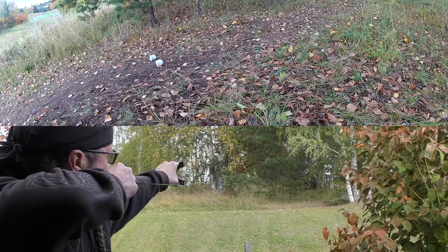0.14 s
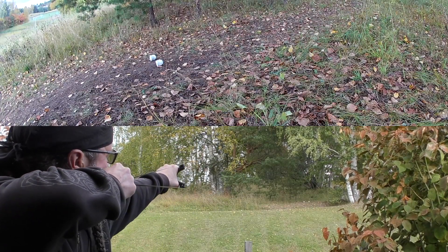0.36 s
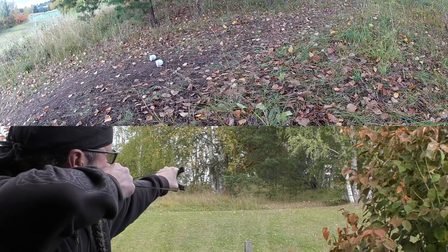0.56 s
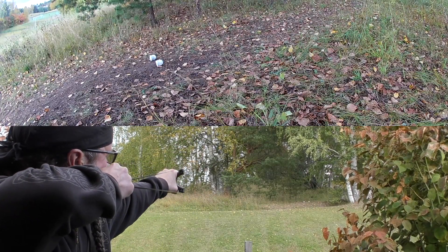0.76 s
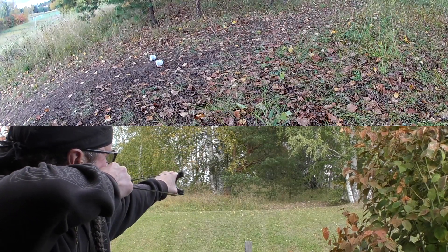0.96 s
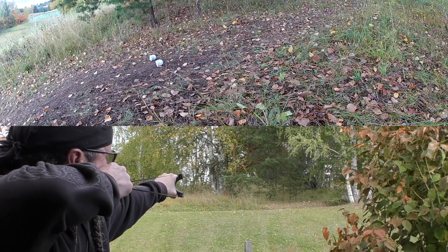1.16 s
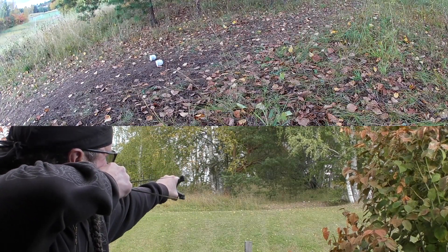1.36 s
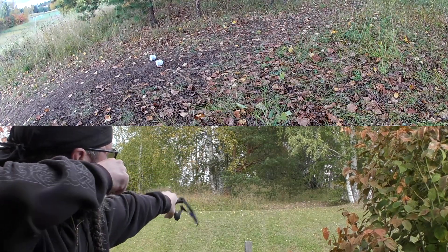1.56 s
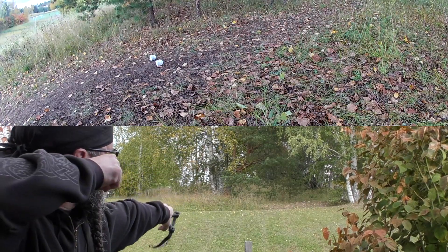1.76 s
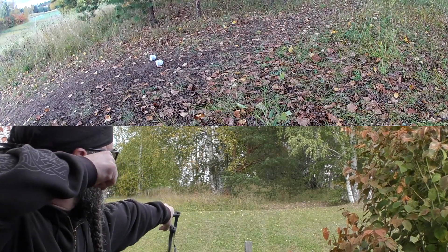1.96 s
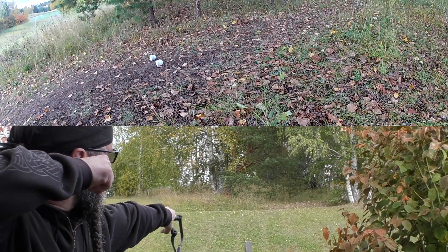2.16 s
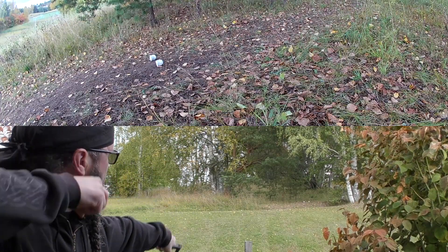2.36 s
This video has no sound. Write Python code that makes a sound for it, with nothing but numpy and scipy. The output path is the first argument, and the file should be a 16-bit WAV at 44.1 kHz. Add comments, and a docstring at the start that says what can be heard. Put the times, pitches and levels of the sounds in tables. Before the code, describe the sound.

A slingshot fires once outdoors. Before it there is only faint steady wind, with barely audible bird chirps around 1 second. At about 1.4 seconds the bands snap, sharp and close, with a low thump and brief ring, then slap the hand lightly at 1.6. At 1.8 seconds the shot makes a quieter knock on a hollow target, with a faint rustle of dry leaves. A soft echo fades.

```python
"""Slingshot shot outdoors

Close by, the rubber bands swish forward and crack past the fork; the fork thumps, a puff of air hits
the microphone and nearby surfaces ring briefly. The slack bands slap back against the hand. Farther
off, the shot knocks into a hollow target and sprays dry leaves. Shot and hit echo from the trees,
over faint wind and a few distant bird calls."""
import sys
import numpy as np
from scipy import signal
from scipy.fft import rfft, irfft, next_fast_len
from scipy.io import wavfile
from scipy.ndimage import map_coordinates

SR = 44100
rng = np.random.default_rng(int(sys.argv[2]) if len(sys.argv) > 2 else 0)


def unload_audio(sound):
    """Save the sound as a 16-bit wav file, at the path given as the first command line argument."""
    columns = np.transpose(np.atleast_2d(sound))
    # keep every value between -1 and 1, then stretch to whole-number steps
    steps = np.round(np.clip(columns, -1, 1) * 32767)
    wavfile.write(sys.argv[1], SR, steps.astype(np.int16))


N = 106369


def amp(db):
    """Decibels to gain."""
    return 10 ** (np.asarray(db) / 20)


def unit_rms(x):
    """Scale to rms 1."""
    return x / np.sqrt(np.mean(x ** 2) + 1e-20)


def curve_at(points, hz):
    """Read (freq_hz, value) points on a log frequency axis."""
    freqs, values = np.transpose(points)
    return np.interp(np.log(hz + 1), np.log(freqs + 1), values)


def since(start_s):
    """Seconds since the start, zero before it."""
    return np.maximum(np.arange(N) / SR - start_s, 0)


def wobble(rate_hz):
    """A smooth curve through random knots."""
    knots = rng.standard_normal(int(N * rate_hz / SR) + 4)
    return map_coordinates(knots, [np.arange(N) * rate_hz / SR])


def equalize(x, gain_at):
    """Zero-phase EQ, with gain given as a function of frequency."""
    size = next_fast_len(N + SR // 2)
    hz = np.fft.rfftfreq(size, 1 / SR)
    return irfft(rfft(x, size) * gain_at(hz), size)[..., :N]


# Narrow stereo image of a compact source: freq_hz, side_vs_mid_db
COMPACT_WIDTH = [(100, -18), (2000, -13.5), (8000, -15.5), (15000, -4)]
def noise(spectrum, width=COMPACT_WIDTH, tilt_db=0):
    """Coloured stereo noise of rms 1, tilted by tilt_db per octave above 1 kHz."""
    def mid_side_gains(hz):
        octaves = np.log2(np.maximum(hz, 1000) / 1000)
        colour = amp(curve_at(spectrum, hz) + tilt_db * octaves)
        return np.array([colour, colour * amp(curve_at(width, hz))])
    mid, side = equalize(rng.standard_normal((2, N)), mid_side_gains)
    return unit_rms(np.array([mid + side, mid - side]))


def burst(start_s, t60_s, attack_s=.0001, hold_s=0):
    """Envelope: attack, hold and exponential release."""
    attack = 1 - np.exp(-since(start_s) / attack_s)
    return attack * amp(-60 * since(start_s + hold_s) / t60_s)


def ping(start_s, hz, t60_s, attack_s=.0002):
    """One damped vibration."""
    return np.sin(2 * np.pi * hz * since(start_s)) * burst(start_s, t60_s, attack_s)


# Dark tone of the wind: freq_hz, relative_db
WIND_SPECTRUM = [(15, -39.5), (25, -7), (55, -1), (110, -4), (140, -3.5), (183, -6.5), (253, -6.5),
                 (389, -10), (421, -10), (684, -13.5), (871, -11.5), (1340, -13.5), (3720, -26.5),
                 (15500, -36.5)]
# Its stereo spread: freq_hz, side_vs_mid_db
WIND_WIDTH = [(50, -17), (200, -11.5), (600, -16), (1400, -7.5), (4400, -5), (9000, -10.5), (15000, -0.5)]
def wind():
    """A faint, steady bed of wind in the trees."""
    return amp(-52.5) * noise(WIND_SPECTRUM, WIND_WIDTH)


# Distant calls: start_s, length_s, pitch_hz, level_db
BIRD_CALLS = [(0.709, .26, 4590, -68.5), (0.872, .035, 3540, -67), (1.178, .03, 3520, -66)]
def bird(start_s, length_s, pitch_hz, level_db, sag_hz_per_s=600, waver_hz=55):
    """One thin, wavering whistle that sags slightly in pitch."""
    t = since(start_s)
    hz = pitch_hz - sag_hz_per_s * t + waver_hz * wobble(120.8)
    swell = np.sin(np.pi * np.minimum(t / length_s, 1))
    flicker = amp(2 * wobble(51))
    return amp(level_db) * swell * flicker * np.sin(2 * np.pi * np.cumsum(hz) / SR)


# Bright tone of snapping rubber: freq_hz, relative_db
RUBBER_SPECTRUM = [(150, -19), (450, -1.5), (740, -21), (1250, 1.5), (1800, 1), (3000, -5.5), (5000, -6),
                   (7500, 0.5), (11000, -2.5), (14000, -11.5), (16000, -10)]
# Cracks of pouch and bands: start_s, level_db, t60_s, tilt_db_per_octave
BAND_CRACKS = [(1.4265, -21.5, 0.01, -4), (1.4384, -11, 0.0091, 0), (1.4393, 3.5, .006, 1.5),
               (1.4392, -11, .007, -1), (1.4436, -6.5, 0.011, -3), (1.4453, -12.5, 0.048, 3.5),
               (1.4582, -17, 0.021, 0), (1.4667, -13, 0.013, 5)]
def rubber_bands(midway_db=-34, growth_db=18.5):
    """The pouch slips free; the bands speed up with a growing swish, crack past the fork and flap out."""
    release_s, arrival_s = BAND_CRACKS[0][0], BAND_CRACKS[1][0]
    travel = since(release_s) / (arrival_s - release_s)
    in_flight = (travel > 0) & (travel < 1)
    swish_db = midway_db + growth_db * (np.minimum(travel, 1) - 0.5)
    swish = noise(RUBBER_SPECTRUM) * amp(swish_db) * in_flight
    cracks = sum(amp(db) * burst(start, t60) * noise(RUBBER_SPECTRUM, tilt_db=tilt)
                 for start, db, t60, tilt in BAND_CRACKS)
    return swish + cracks


# Thumps of fork and hand: start_s, level_db, pitch_hz, t60_s
RECOIL_THUMPS = [(1.427, -26, 230, .03), (1.4382, -21, 480.5, .045), (1.4416, -10, 280, 0.02),
                 (1.4458, -19.5, 185, .04), (1.4623, -22, 309, .025)]
def recoil(low_cut_hz=90):
    """Low thumps as the fork is unloaded and jerked by the bands."""
    thumps = sum(amp(db) * ping(start, hz, t60) for start, db, hz, t60 in RECOIL_THUMPS)
    return signal.sosfilt(signal.butter(1, low_cut_hz, "high", fs=SR, output="sos"), thumps)


# Resonances of nearby surfaces: pitch_hz, relative_db, t60_s
SURFACE_MODES = [(239, -3.5, 0.27), (418.4, 6, 0.077), (1300, 2.5, .16), (1650, -6.5, .14),
                 (2170, -16.5, .14), (2423, 6, 0.14), (4574, 9, 0.17), (5660, -1, 0.29), (6500, -6, 0.25),
                 (7280, -1.5, .14), (7500, -1.5, .14), (8060, -3.5, .14), (8460, 3.5, .15),
                 (10500, -3.5, .14)]
# Tone of the wash of near reflections: freq_hz, relative_db
WASH_SPECTRUM = [(60, -16.5), (230, 1), (480, -4), (750, -13), (1250, -3), (2400, -5.5), (3300, -2.5),
                 (7500, -2), (11000, -3), (14000, -9.5), (16000, -14)]
# Its stereo spread: freq_hz, side_vs_mid_db
WASH_WIDTH = [(150, -15.5), (400, -11.5), (1300, 1.5), (4400, -9), (8000, -11), (15000, -2.5)]
def ringing_surfaces(start_s=1.441):
    """The cracks set nearby surfaces ringing, inside a short, fluttering wash of reflections."""
    modes = 0
    for hz, db, t60 in SURFACE_MODES:
        stereo_gains = amp(db + rng.normal(0, 1, (2, 1)))
        modes += stereo_gains * ping(start_s - rng.uniform(0, .002), hz, t60, attack_s=.002)
    wash = noise(WASH_SPECTRUM, WASH_WIDTH)
    flutter = amp(1.9 * wobble(500))
    envelope = burst(start_s, t60_s=.18, attack_s=.0035)
    return amp(-33) * modes + amp(-12) * envelope * unit_rms(wash * flutter)


def air_puff():
    """A puff of air hits the microphone: a bass pop, mostly on the left."""
    pan = np.array([[1], [.15]])
    return amp(-15) * ping(start_s=1.4415, hz=80, t60_s=.062, attack_s=.0065) * pan


# Tone of a dull contact: freq_hz, relative_db
BLOW_SPECTRUM = [(230, -7), (360, 2), (650, -3), (1250, -0.5), (2000, -13), (5000, -22), (16000, -39)]
def dull_blows(blows, noise_db, attack_s):
    """Each blow is one quickly damped mode and a burst of noise."""
    total = 0
    for start, db, hz, t60 in blows:
        scuff = amp(noise_db) * burst(start, t60, attack_s) * noise(BLOW_SPECTRUM)
        total += amp(db) * (ping(start, hz, t60, attack_s) + scuff)
    return total


# Rubber on skin: start_s, level_db, pitch_hz, t60_s
HAND_SLAPS = [(1.5652, -31.5, 580, .025), (1.5715, -43, 400, 0.058), (1.6065, -43, 460, .025)]
def band_slaps():
    """The slack bands swing back and slap the hand."""
    return dull_blows(HAND_SLAPS, noise_db=-7, attack_s=.00033)


# Knocks on the target: start_s, level_db, pitch_hz, t60_s
TARGET_KNOCKS = [(1.8207, -22, 820, 0.0072), (1.8257, -36, 867, 0.046), (1.8373, -11.5, 720, 0.013),
                 (1.847, -28, 684, 0.024)]
def target(low_cut_hz=314):
    """The shot knocks into a hollow target too small to radiate much bass."""
    knocks = dull_blows(TARGET_KNOCKS, noise_db=-11, attack_s=.0004)
    return signal.sosfilt(signal.butter(2, low_cut_hz, "high", fs=SR, output="sos"), knocks)


# Crisp tone of dry leaves: freq_hz, relative_db
LEAF_SPECTRUM = [(300, -19), (1500, -9), (3000, 1), (7000, 2), (11000, -4.5), (15500, -16)]
# Bits falling back: start_s, level_db, t60_s
LEAF_LANDINGS = [(2.024, -55, .02), (2.127, -62.5, 0.088)]
def leaves():
    """The shot throws up a grainy spray of dry leaves and grit, and a few bits land."""
    spray = amp(-49) * burst(start_s=1.824, t60_s=.26, attack_s=.00299, hold_s=.04)
    landings = sum(amp(db) * burst(start, t60) for start, db, t60 in LEAF_LANDINGS)
    rustle = unit_rms(noise(LEAF_SPECTRUM) * amp(2.5 * wobble(900)))
    return (spray + landings) * rustle


# Decay of the echo among the trees: freq_hz, t60_s
TREE_DECAY = [(100, .6), (1000, 0.79), (6000, 0.48), (15000, .45)]
def tree_echo(send, predelay_s=.015, width=.5):
    """The trees scatter sound into a diffuse tail whose mids linger longest."""
    hz, t, spectrum = signal.stft(rng.standard_normal((2, SR // 2)), SR, nperseg=256)
    decay = amp(-60 * t / curve_at(TREE_DECAY, hz)[:, None])
    mid, side = signal.istft(spectrum * decay, SR, nperseg=256)[1]
    tail = np.pad([mid + width * side, mid - width * side], ((0, 0), (int(predelay_s * SR), 0)))
    return signal.fftconvolve(send, tail / np.linalg.norm(tail[0]), axes=1)[:, :N]


def scene(shot_send_db=-27, hit_send_db=-25.5):
    """The close shot and the farther hit with their echo, over birds and wind."""
    shot = rubber_bands() + recoil() + air_puff() + ringing_surfaces() + band_slaps()
    hit = target() + leaves()
    echo = tree_echo(amp(shot_send_db) * shot + amp(hit_send_db) * hit)
    birds = sum(bird(*call) for call in BIRD_CALLS)
    return shot + hit + echo + birds + wind()


# Stereo width of the microphone: freq_hz, side_gain_db
MIC_SIDE_EQ = [(400, -1), (650, -14.5), (1000, -2.5), (5500, 2), (7000, -21.5), (8800, -0.5)]
def record(dry, ceiling=.92, high_cut_hz=15900, edge_hz=70):
    """The microphone narrows the image in two bands; peaks clip and a steep high cut trims the top."""
    mid = dry.mean(axis=0)
    side = equalize(dry - mid, lambda hz: amp(curve_at(MIC_SIDE_EQ, hz)))
    clipped = np.clip(mid + side, -ceiling, ceiling)
    return equalize(clipped, lambda hz: (1 - np.tanh((hz - high_cut_hz) / edge_hz)) / 2)


dry = scene()
out = record(dry)
unload_audio(out)
```